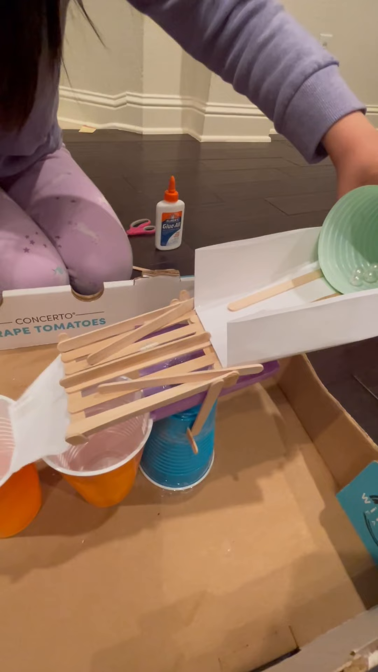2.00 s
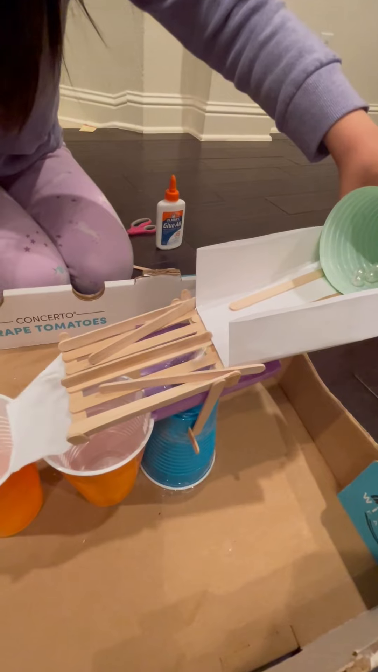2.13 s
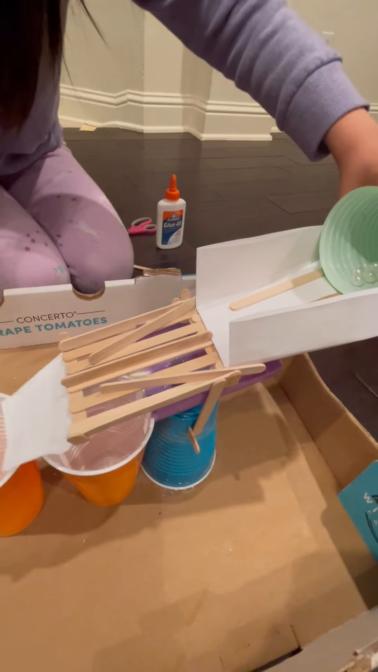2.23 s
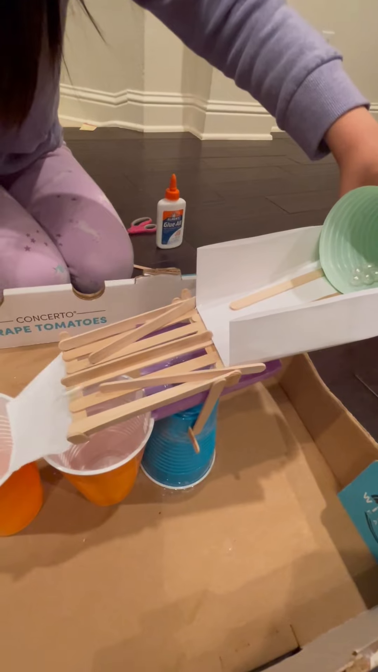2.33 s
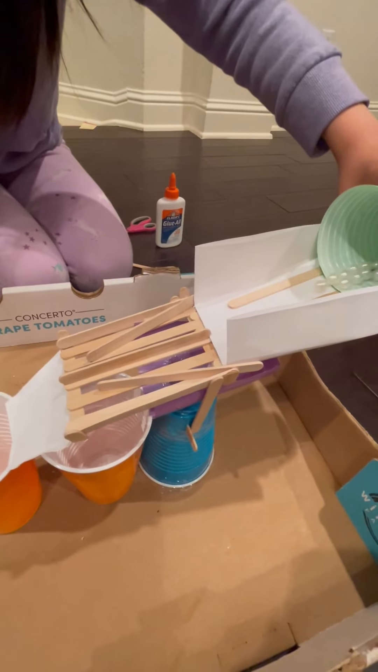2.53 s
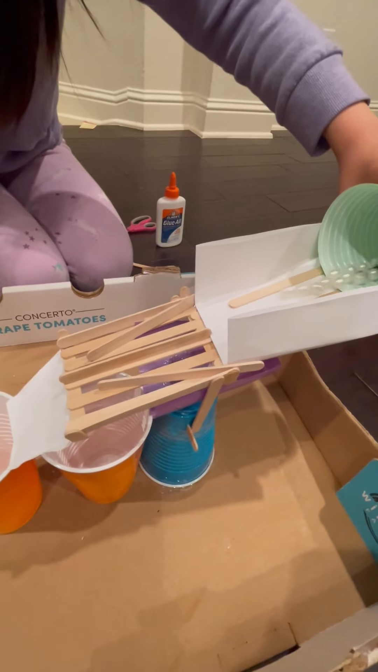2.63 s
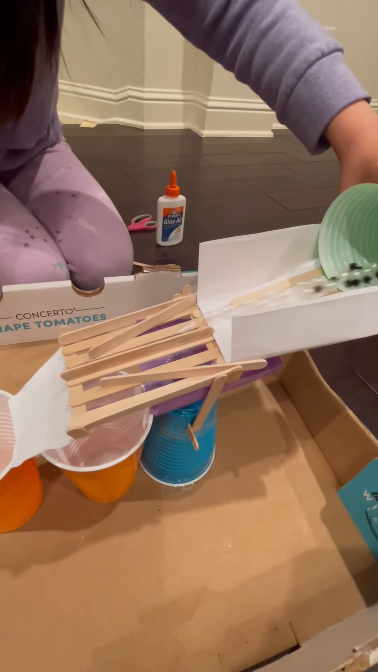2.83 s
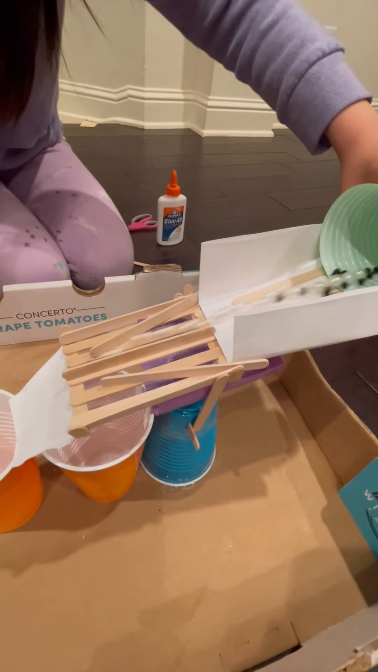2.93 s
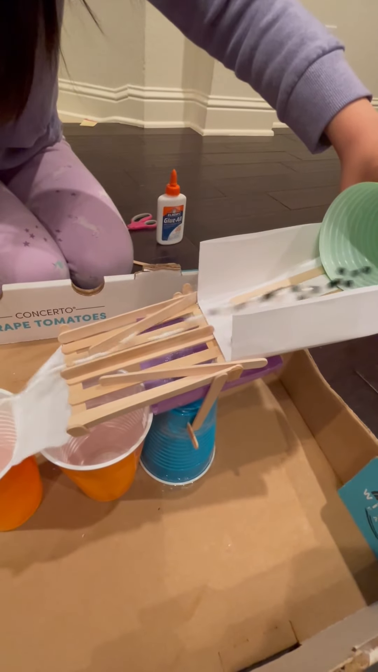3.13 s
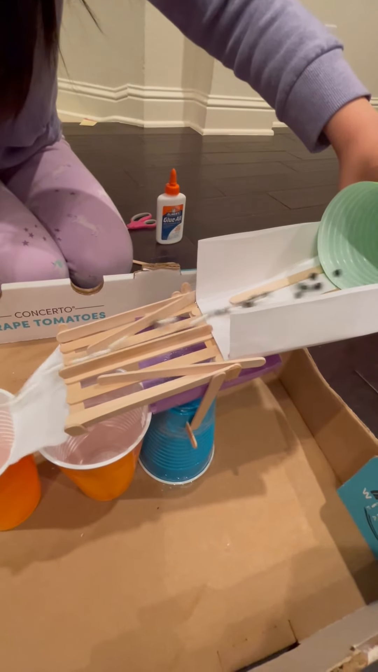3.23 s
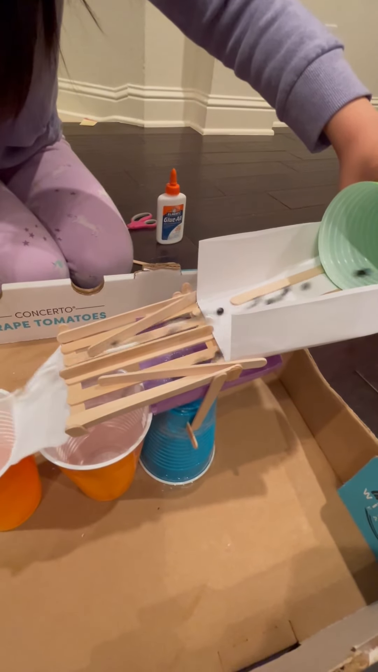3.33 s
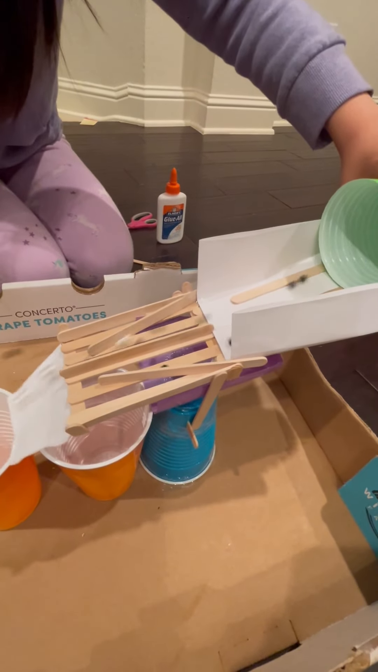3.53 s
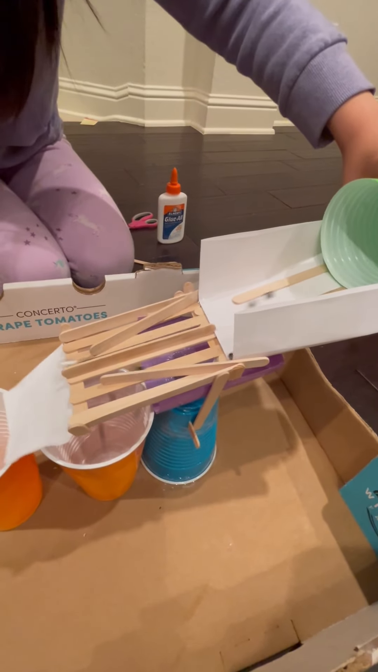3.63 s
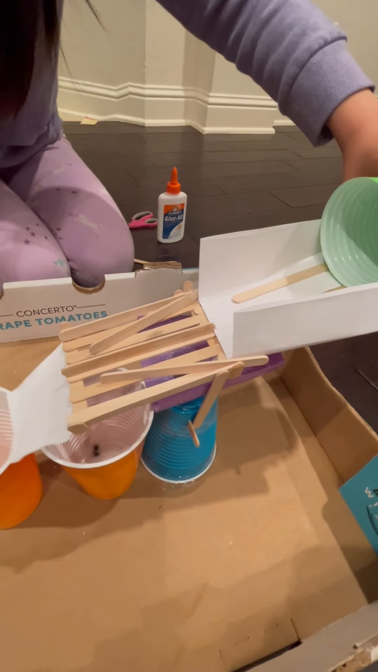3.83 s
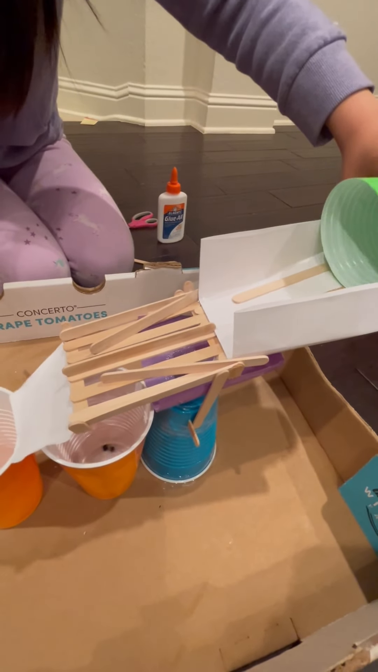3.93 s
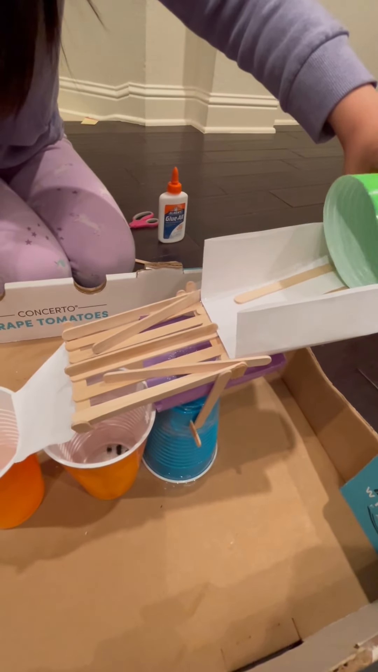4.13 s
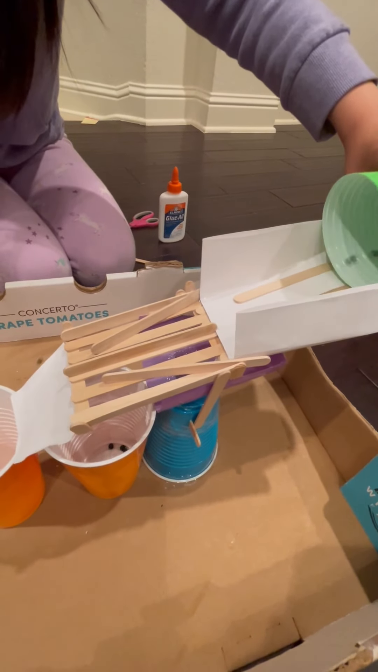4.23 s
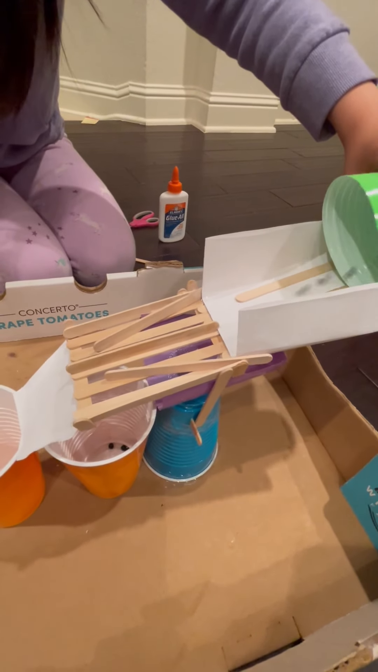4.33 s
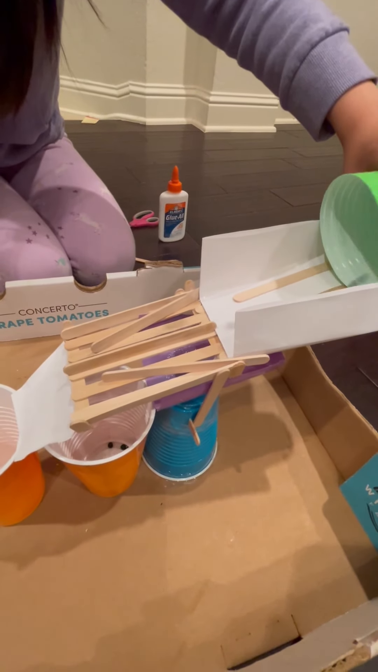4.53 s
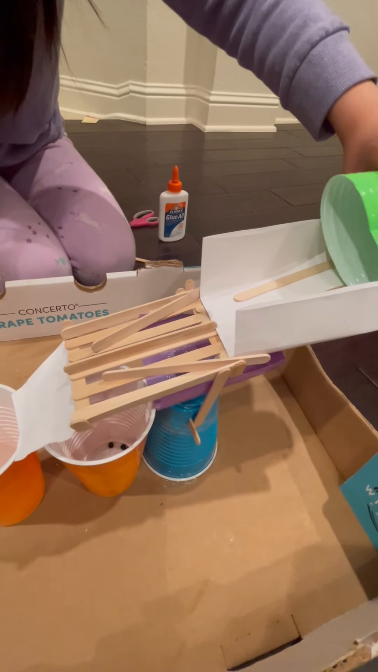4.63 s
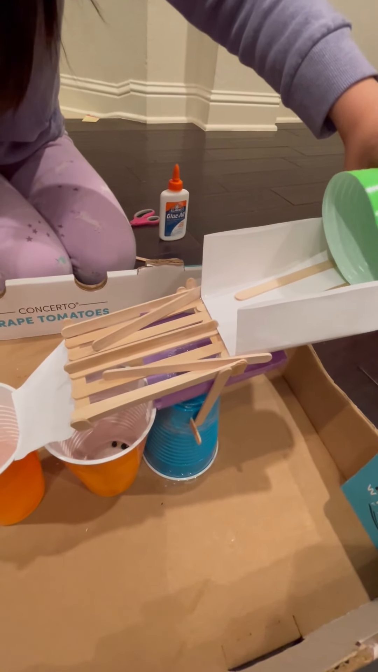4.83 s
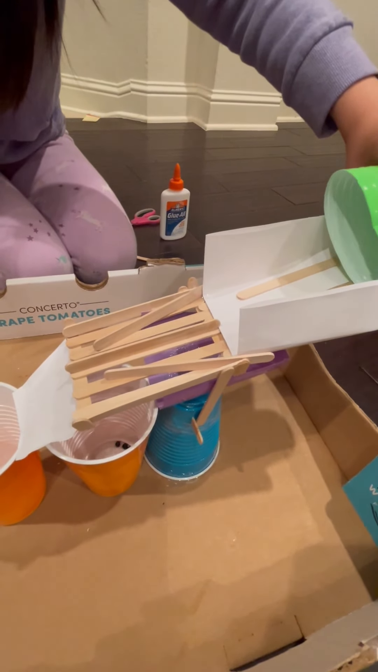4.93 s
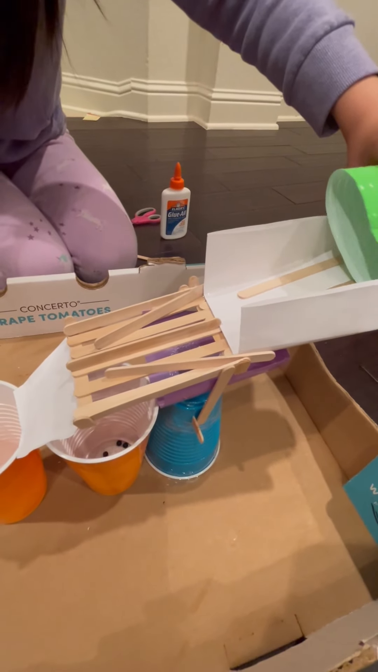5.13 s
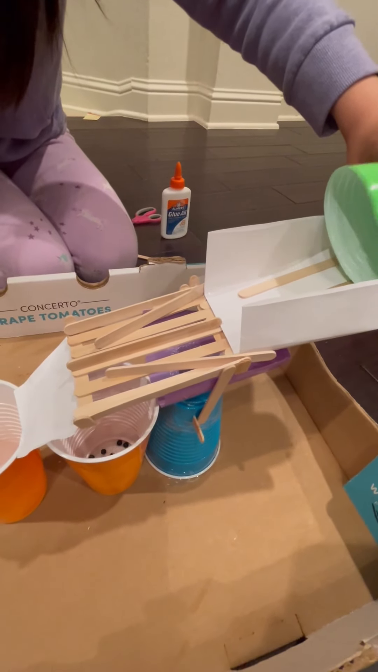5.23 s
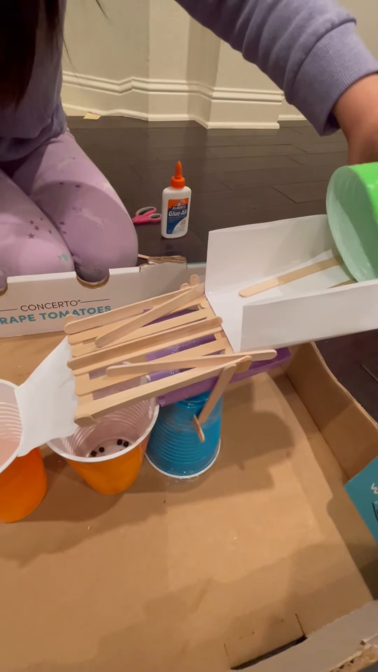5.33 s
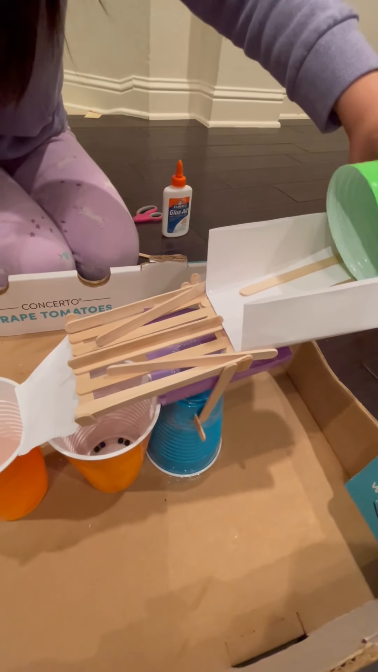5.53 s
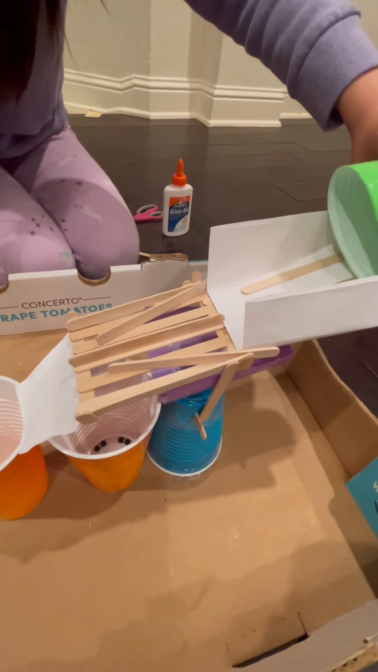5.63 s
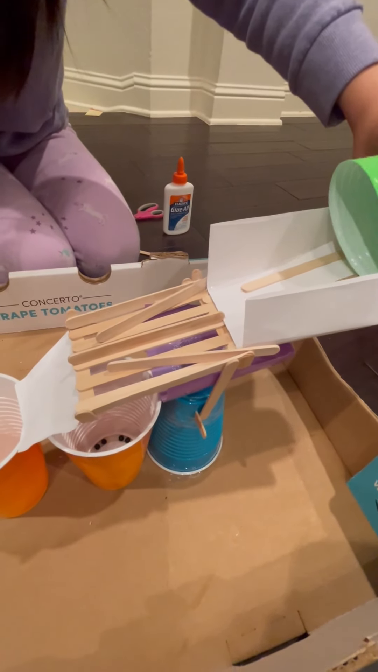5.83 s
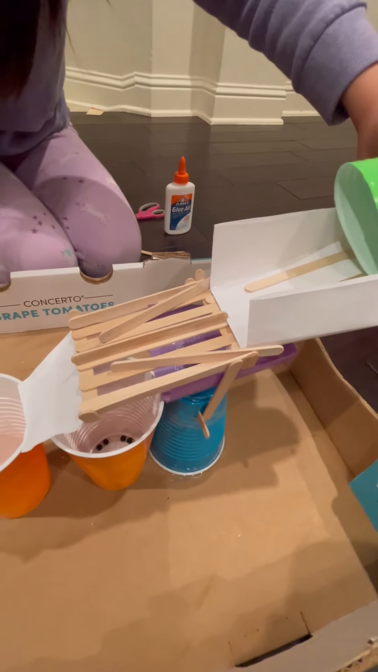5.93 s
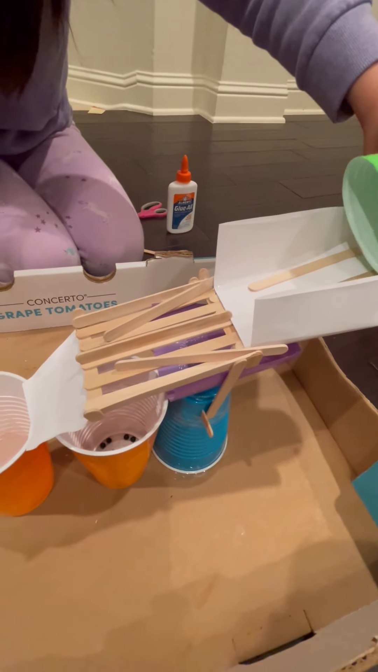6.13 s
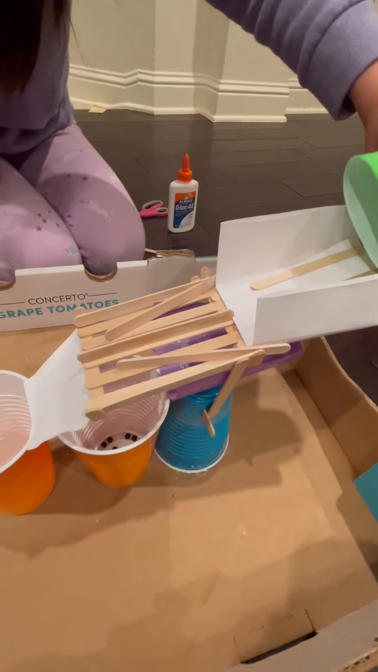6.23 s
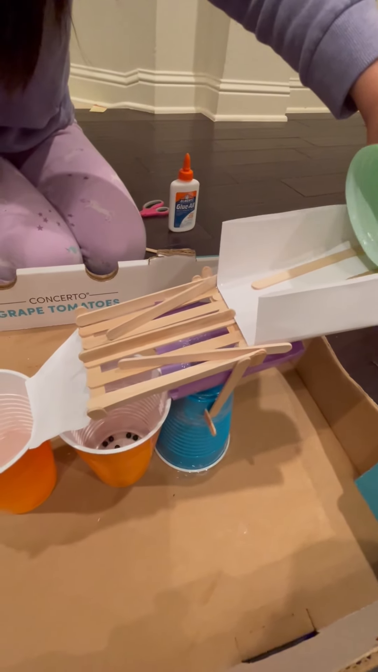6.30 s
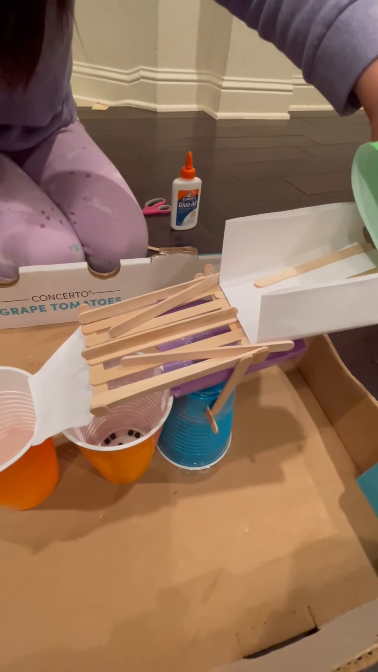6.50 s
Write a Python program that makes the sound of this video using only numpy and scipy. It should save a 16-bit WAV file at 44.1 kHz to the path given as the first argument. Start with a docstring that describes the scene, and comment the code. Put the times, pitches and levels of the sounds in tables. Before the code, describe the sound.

Close, dry clatter of tiny beads pouring down card and wooden sticks, cracking into plastic cups, circling hollowly and trailing off in stray ticks.

```python
"""A bowl of small plastic beads is tipped over a card chute and a ramp of wooden sticks, close by in a living room.
A few knocks and hollow rolling come first, then the heap slides in a hiss of tiny noise contacts.
A first wave taps, drums and skids down the card, and strikes and modal knocks ring from thin plastic.
Low bumps boom in the cardboard before a second, denser wave; then the last beads circle in a humming bowl
and stragglers rattle on. A short noise tail answers as the room, over a faint hush throughout."""
import sys
import numpy as np
from scipy import signal
from scipy.fft import rfft, irfft, next_fast_len
from scipy.io import wavfile
from scipy.ndimage import uniform_filter1d, minimum_filter1d

SR = 44100
rng = np.random.default_rng(int(sys.argv[2]) if len(sys.argv) > 2 else 0)


def unload_audio(sound):
    """Save the sound as a 16-bit wav file, at the path given as the first command line argument."""
    columns = np.transpose(np.atleast_2d(sound))
    # keep every value between -1 and 1, then stretch to whole-number steps
    steps = np.round(np.clip(columns, -1, 1) * 32767)
    wavfile.write(sys.argv[1], SR, steps.astype(np.int16))


N = 289516
TIME = np.arange(N) / SR

# colour of a bead cracking against plastic: f/Hz, gain/dB
CRACK_COLOUR = [(100, -22.5), (300, -8), (520, -1.5), (740, 4), (1100, 6), (1750, 6), (2150, 2), (3400, 9),
                (4700, 5), (5700, 3.5), (7500, -5.5), (10500, -7.5), (14300, -12.5), (15500, -18.5)]
# how much the beads circle and jostle on plastic: t/s, level/dB before the trims of each layer
ROLL_LEVEL = [(1.2, -66.5), (1.75, -59.5), (1.97, -42.5), (2.6, -38), (2.95, -42), (3.2, -40),
              (3.45, -34.5), (3.88, -33), (4.05, -40), (4.3, -50), (4.6, -52.5), (4.95, -45), (5.25, -47),
              (5.38, -61), (5.6, -65.5), (6.0, -64), (6.05, -51), (6.28, -65.5), (6.45, -67), (6.56, -88)]
# colour of beads rolling on plastic: f/Hz, gain/dB
ROLLING_COLOUR = [(59, -33), (100, -19), (289, -9.5), (547, -8), (768, 5.5), (1080, -7.5), (1520, -6),
                  (1740, -1), (1880, -2.5), (2050, -6), (2420, -3), (2750, -3), (3300, -5.5), (3580, -1.5),
                  (3900, -5), (4570, -8), (6020, -6), (7290, -3), (10500, -3)]
# two waves of beads roll down the card chute: t/s, level/dB before the trims of each layer
CHUTE_LEVEL = [(1.05, -70), (1.2, -50.5), (1.38, -53.5), (1.7, -43.5), (2.25, -45.5), (2.5, -53),
               (2.95, -45.5), (3.25, -40), (3.65, -46.5), (4.25, -97.5)]


def strikes(ring_db=0, detune=0.025, vary_db=5.5, clack_db=-13, body_db=0, tick_db=0,
            body_lag_s=0.00044, tick_t60=0.021):
    """Each bead cracks against a thin wall; where it lands decides which modes ring."""
    # the loudest strikes: t/s, clack level/dB, hollow body level/dB, glassy tick level/dB, before the trims
    loud_strikes = [(0.375, -69, -71, -82), (0.588, -37.5, -55, -52.5), (0.606, -41.5, -60, -61),
                    (0.6869, -41, -54, -62), (0.7143, -44, -52.5, -59), (0.7221, -34, -52, -58),
                    (0.7532, -35, -51, -48), (0.7761, -38, -56, -48), (0.7915, -31.5, -63, -44),
                    (0.8165, -27, -48, -43), (0.8614, -26, -62, -35.5), (0.9227, -27, -42, -38),
                    (0.9713, -29, -48, -41), (1.041, -31, -48, -34), (1.0662, -24, -47, -38.5),
                    (1.0757, -36, -51, -38), (1.1059, -30, -47, -46), (1.3129, -35, -46, -43),
                    (1.7419, -19, -34, -33.5), (1.7789, -26, -39, -34.5), (1.8143, -7.5, -21.5, -21.5),
                    (1.8396, -9, -30.5, -25), (1.8574, -7, -23.5, -29), (1.8776, -24, -49, -22),
                    (1.9277, -20.5, -34, -33.5), (1.9424, -24.5, -36, -39), (1.967, -9.5, -30.5, -21.5),
                    (2.0412, -10.5, -34, -26.5), (2.0581, -14, -32, -34), (2.0668, -20, -38, -33),
                    (2.078, -27, -33.5, -37), (2.1233, -19.5, -36, -46), (2.1405, -5.5, -25, -27.5),
                    (2.1789, -20, -40, -32.5), (2.2346, -10, -29.5, -24), (2.2175, -23.5, -41, -42),
                    (2.2787, -16, -37.5, -27), (2.2981, -11.5, -41, -26), (2.307, -20.5, -41, -27.5),
                    (2.3549, -15.5, -36, -31.5), (2.4179, -22, -41, -33), (2.438, -8.5, -23.5, -22),
                    (2.536, -18, -27.5, -32), (2.5974, -23.5, -41, -35), (2.6302, -5.5, -20, -20.5),
                    (2.7958, -11, -37, -23.5), (3.245, -5.5, -22.5, -22.5), (3.272, -27, -39, -38),
                    (3.2902, -20, -42, -38), (3.304, -14, -36, -30), (3.3195, -8.5, -29.5, -38),
                    (3.3246, -9, -33, -16), (3.3444, -11, -32, -27), (3.3803, -3.5, -20, -17.5),
                    (3.3995, -16, -34, -31), (3.4052, -7.5, -25, -24), (3.4275, -23, -43, -43),
                    (3.4532, -7.5, -39, -25), (3.4735, -16, -30, -34), (3.4993, -10, -28, -27),
                    (3.529, -13, -37, -25.5), (3.548, -11.5, -35, -30), (3.5844, -14, -31.5, -28.5),
                    (3.637, -19, -38, -39), (3.6444, -11, -35, -31), (3.649, -10, -40, -26),
                    (3.6533, -14, -37, -28), (3.6638, -10.5, -30, -26), (3.6838, -26, -40, -32),
                    (3.7057, -15, -38, -35), (3.7334, -13, -43, -24), (3.7439, -13, -28, -34),
                    (3.7535, -9, -33, -23), (3.7692, -13, -25, -36.5), (3.792, -8, -25, -28),
                    (3.7969, -10.5, -33, -42), (3.823, -7, -26, -23.5), (3.8477, -11, -43, -35),
                    (3.8724, -16, -38, -32), (3.9068, -18, -35, -33), (3.9184, -13, -30.5, -29.5),
                    (3.9512, -10.5, -40, -28), (3.9654, -5, -23, -17.5), (4.0076, -17.5, -35, -37),
                    (4.0725, -14, -33, -26.5), (4.117, -9.5, -33.5, -26), (4.1431, -15, -36, -49),
                    (4.1657, -18, -43, -38), (4.1755, -20, -39.5, -34.5), (4.2112, -26, -42, -42),
                    (4.247, -17, -38.5, -36.5), (4.2818, -26, -49, -54), (4.3537, -18.5, -41.5, -48.5),
                    (4.4059, -32, -47, -65), (4.4825, -36, -47, -59), (4.5234, -39, -53, -42.5),
                    (4.576, -29.5, -47, -59), (4.5875, -28, -61, -41.5), (4.6646, -29.5, -67, -40),
                    (4.6906, -33, -63, -43), (4.724, -30, -53, -40), (4.7391, -32, -54, -37.5),
                    (4.7524, -16.5, -38.5, -44), (4.786, -24, -42, -41), (4.8005, -9, -31.5, -21.5),
                    (4.8214, -21.5, -44, -36), (4.846, -26, -42, -33), (4.877, -10.5, -26.5, -22.5),
                    (4.8884, -18, -55, -33), (4.9049, -10.5, -39, -25.5), (4.9224, -19, -47, -40),
                    (4.9587, -12.5, -29, -24.5), (4.9831, -8, -38.5, -17), (4.9904, -19, -51, -38),
                    (5.0252, -6.5, -37, -20), (5.043, -17.5, -43, -29), (5.1318, -20.5, -32.5, -30.5),
                    (5.139, -22, -40, -37), (5.174, -24, -38.5, -28.5), (5.1651, -8, -35, -24),
                    (5.2684, -24, -41.5, -35.5), (5.3482, -49, -59, -67), (5.3974, -38.5, -44, -59),
                    (5.4473, -41, -54, -71), (5.4892, -33, -56, -47), (5.5103, -36, -49.5, -59),
                    (5.521, -36, -57, -57), (5.54, -42, -54, -64), (5.5719, -41, -55.5, -63),
                    (5.6307, -24.5, -48.5, -38), (5.6886, -37, -57, -55), (5.7165, -37.5, -49, -53),
                    (5.7555, -31.5, -56, -33), (5.8363, -24.5, -46.5, -47), (5.891, -33.5, -51.5, -46),
                    (6.0322, -12, -31, -26.5), (6.0785, -25, -50, -39), (6.0993, -22.5, -42, -41),
                    (6.1045, -22, -42, -36.5), (6.1405, -25.5, -38, -40), (6.2276, -48.5, -48.5, -65),
                    (6.4116, -51, -66, -63), (6.4685, -36.5, -51, -54)]
    # what the thin plastic rings with: f/Hz, level/dB before its variation, t60/s
    plastic_modes = [(647, -10, 0.054), (756, -6, 0.032), (860, -20.5, 0.075), (1632, -5, 0.016),
                     (1897, -7.5, 0.047), (2804, -11.5, 0.026), (3774, -24.5, 0.051), (4800, -58, 0.017),
                     (5373, -13.5, 0.026), (10360, -5.5, 0.019)]
    size, onset = 3600, 600  # samples: a whole strike, and the start that sets its level
    # lighter strikes among the moving beads: clack, body and tick in dB relative to the jostling
    light_strikes = by_chance(jostle_db, per_s=30, scatter_db=1.5, offsets_db=(10.5, -13.5, -3.5))
    rows = list(loud_strikes) + light_strikes
    t = np.arange(size) / SR
    hz, mode_db, t60 = np.transpose(plastic_modes)
    rings = undb(mode_db + ring_db)[:, None] * fade(t, t60[:, None])
    blows = []
    for _ in rows:
        pitch, weight = rng.standard_normal((2, len(hz), 1))
        phase = 2 * np.pi * rng.random((2, len(hz), 1))
        mode_hz = hz[:, None] * (1 + detune * pitch)
        modes = rings * undb(vary_db * weight) * np.sin(2 * np.pi * mode_hz * t + phase)
        blows.append(crack(t) + .5 * modes.sum(axis=1))
    blows = colour(np.concatenate(blows), CRACK_COLOUR)
    clack = band(blows, 1050, 7000)
    body = band(blows, 240, 1050)
    tick = band(blows, 7000, 17000) * fade(t, tick_t60)
    # the wall's slow bending swells just after the contact; the hard tick dies first
    parts = [(clack, clack_db, 0), (body, body_db, body_lag_s), (tick, tick_db, 0)]
    out = np.zeros((2, N + 2 * size))
    for column, (part, trim_db, lag) in enumerate(parts):
        for row, blow in zip(rows, part.reshape(-1, 2, size)):
            start = int((row[0] + lag) * SR)
            even = blow / blow[:, :onset].std(axis=1, keepdims=True)
            out[:, start:start + size] += even * undb(row[1 + column] + trim_db)
    return out[:, :N]


def crack(t, round_s=0.00087, echo_t60=0.026, smear_t60=0.00076, hold_s=0.0026,
          wash_db=-12, wash_t60=0.04, contact_s=0.00056):
    """A click, smeared by the bending wall, bounces across the cup and blurs into a short wash."""
    count = 10
    gaps = round_s * rng.uniform(.7, 1.3, count)
    when = np.cumsum(gaps) - gaps[0]
    arrivals = np.zeros(len(t))
    arrivals[(when * SR).astype(int)] = fade(when, echo_t60) * rng.uniform(.4, 1.4, count)
    clicks = signal.lfilter([1], [1, -fade(1 / SR, smear_t60)], arrivals)
    wash = fade(np.maximum(t - hold_s, 0), wash_t60)
    press = 1 - np.exp(-t / contact_s)
    return .5 * press * (clicks / undb(wash_db) + wash) * rng.standard_normal((2, len(t)))


def taps(t60=0.026, level_db=1, edge_db=-4.5):
    """Card and wood hardly ring: a short, dull clack, with a bright edge where the contact is hard."""
    # the loudest dry taps on the card chute and the sticks: t/s, clack level/dB, edge level/dB, before the trims
    loud_taps = [(1.268, -27, -59), (1.288, -32, -62), (1.3376, -27, -51), (1.3807, -44, -57),
                 (1.43, -35, -55), (1.455, -27, -39.5), (1.4761, -22, -50), (1.4869, -22, -48),
                 (1.5047, -23.5, -34), (1.527, -31, -52), (1.559, -27, -44), (1.5758, -28, -41),
                 (1.5853, -23.5, -39), (1.591, -22, -34), (1.6198, -27, -35), (1.6246, -24, -31),
                 (1.6656, -36.5, -43), (1.6958, -32, -45), (1.7023, -29, -47), (1.7129, -26, -39),
                 (1.724, -33, -48), (1.75, -25, -43), (1.8027, -23, -55), (2.952, -29, -50),
                 (3.0764, -30, -31), (3.119, -27, -29.5), (3.153, -24, -32.5), (3.1724, -20.5, -49),
                 (3.208, -21.5, -41), (4.4823, -22, -47), (5.836, -28, -36), (6.493, -38.5, -71)]
    # colour of a tap: f/Hz, gain/dB
    tap_tint = [(150, -2.5), (260, 0), (420, 3.5), (1100, 7.5), (1700, 13), (2800, 12.5), (3700, 2.5),
                (4600, 8), (5200, 10.5), (5800, 5.5), (9000, 0.5), (15000, -13.5)]
    # lighter taps while beads are on the chute: clack and edge in dB relative to the chute curve
    light_taps = by_chance(chute_db, per_s=40, scatter_db=1.5, offsets_db=(13, -0.5))
    out = np.zeros((2, N + SR))
    t = np.arange(SR // 20) / SR
    onset = 600  # samples that set the edge's level
    for s, db, bright_db in loud_taps + light_taps:
        tap = colour(rng.standard_normal((2, len(t))) * fade(t, t60), tap_tint)
        dull, edge = band(tap, 180, 3600), band(tap, 3900, 16000)
        dull = dull / np.abs(dull[0]).max() * undb(db + level_db)
        edge = edge / rms(edge[:, :onset]) * undb(bright_db + edge_db)
        start = int(s * SR)
        out[:, start:start + len(t)] += dull + edge
    return out[:, :N]


def knocks(push_s=0.00092, level_db=0):
    """Bowl, cup or card rings in a few close modes; the higher the pitch, the sooner they die."""
    # contacts that leave a resonance ringing: t/s, level/dB, f/Hz, ring length relative to the usual
    contacts = [(0.374, -61, 703, 0.56), (.589, -43, 780, 1.2), (.607, -42, 793, 1), (.621, -37, 760, 0.97),
                (1.185, -25.5, 840, 0.87), (1.269, -20.5, 2050, .5), (1.291, -26, 2140, .5),
                (1.3375, -20, 2190, 0.43), (1.478, -18, 2300, 0.48), (1.587, -18.5, 1780, 0.5),
                (1.814, -3, 3740, 1.3), (1.841, -18, 1880, 1), (1.878, -11, 3540, 1.2),
                (1.933, -24, 784, 0.81), (1.968, -10, 840, 0.56), (2.072, -25, 728, 1.7),
                (2.167, -28, 794, 1.3), (2.268, -25, 750, 0.85), (2.356, -23.5, 810, 0.68),
                (2.440, -12, 716, 0.67), (2.525, -13.5, 3360, 0.96), (2.577, -30.5, 780, 1.2),
                (2.597, -17, 3550, 1.4), (2.631, -7, 2707, 1.36), (2.633, -21, 740, 1.2),
                (2.795, -14, 1870, 1.4), (2.800, -32.5, 807, 2.1), (3.320, -11, 3480, 1.3),
                (3.382, -18, 699, 1.1), (3.453, -11, 3540, 1.4), (3.514, -20.5, 751, 1.6),
                (3.523, -10, 3530, 1.6), (3.578, -24.5, 807, 1.3), (3.655, -21, 1630, 1.1),
                (3.657, -29, 807, 1.2), (3.793, -22, 1950, 1.5), (3.913, -29, 760, 0.96),
                (3.952, -11, 1896, 1.3), (4.791, -26, 795, 0.73), (4.985, -8.5, 1954, 1.4),
                (5.043, -9.5, 4980, 1.4), (5.226, -36, 934, 1.2), (5.306, -39, 785, 0.78),
                (5.398, -42, 845, .35), (5.401, -41, 285, 0.28), (5.648, -33.5, 835, 0.82),
                (5.742, -33.5, 804, 0.53), (5.836, -23.5, 1278, 1.36), (5.837, -34.5, 710, 1.1),
                (5.866, -35.5, 694, 0.92), (5.892, -8, 5250, 0.66), (6.034, -10, 1640, 0.33),
                (6.035, -24, 686, 1.7), (6.142, -42, 700, 3.3), (6.308, -41, 1870, 0.68),
                (6.492, -25, 850, 0.66), (6.493, -26.5, 1080, 0.38)]
    # what a knock rings with: multiple of the pitch, level/dB, usual cycles to fade by 60 dB
    mode_rows = [(.8, -28.5, 41), (.92, -12, 70), (1.002, 2.5, 33), (1.14, -9.5, 43), (1.35, -16, 30.5),
                 (1.899, -13, 34.5), (2.699, -6.5, 41)]
    out = np.zeros(N + SR)
    t = np.arange(SR // 4) / SR
    for s, db, hz, length in contacts:
        ring = np.zeros(len(t))
        for multiple, mode_db, cycles in mode_rows:
            mode_hz = hz * multiple
            tone = np.sin(2 * np.pi * (mode_hz * t + rng.random()))
            ring += undb(mode_db) * fade(t, length * cycles / mode_hz) * tone
        start = int(s * SR)
        out[start:start + len(t)] += undb(db + level_db) * ring * (1 - np.exp(-t / push_s))
    return np.array([band(out[:N], 180, 17000), np.zeros(N)])


def sliding(creep_start_s=0.54, creep_db=-53.5, creep_rise_s=0.11, creep_t60=0.76):
    """A few beads start to roll hollowly, then the heap slips over the bowl's wall in a hiss of contacts."""
    # colour of the slide: f/Hz, gain/dB
    slide_tint = [(59, -53), (100, -25), (328, -27), (471, -4.5), (595, -20.5), (891, 5.5), (1450, -14.5),
                  (2000, -5), (2690, -9.5), (4800, -7), (5900, -5), (7290, -8), (10500, -12),
                  (12400, -15.5), (14100, -23.5), (16000, -20)]
    contacts = patter(rate=1100, scatter_db=3, t60=.012)
    hiss = colour(contacts, slide_tint)
    hollow = band(colour(contacts, ROLLING_COLOUR), 570, 1240)
    since = np.maximum(TIME - creep_start_s, 0)
    creep = undb(creep_db) * (1 - np.exp(-since / creep_rise_s)) * fade(since, creep_t60)
    hiss_gain = undb(slide_db(TIME)) + undb(2.5) * creep
    return hiss / rms(hiss) * hiss_gain + hollow / rms(hollow) * creep


def slide_db(times):
    """Level of the sliding heap: a quick rise as it breaks loose, a slow sag, then it stops."""
    full_s, stop_s, full_db = 0.815, 1.2, -33.5
    rise, sag, stop = 279, 19.5, 323  # dB per s
    since = times - full_s
    db = full_db + np.minimum(rise * since, -sag * since)
    return np.maximum(db - stop * np.maximum(times - stop_s, 0), -140)


def jostle_db(times, grain_db=-9.5):
    """How hard beads jostle on plastic: rolling free, or as single contacts standing out of the slide."""
    return np.maximum(level_at(ROLL_LEVEL, times), slide_db(times) + grain_db)


def chute(level_db=-4.0, drum_db=-1, drum_width_hz=100):
    """Many beads roll together on the card, which drums at a shifting pitch under a fine chatter."""
    # colour of the chatter: f/Hz, gain/dB
    chatter_tint = [(59, -40.5), (100, -13), (181, -3.5), (290, 2), (390, 0.5), (470, 1.5), (570, -6.5),
                    (891, 7.5), (1200, -6.5), (1800, 1.5), (2170, -6), (3120, -9.5), (3860, -22),
                    (5080, -30.5), (7140, -16), (16000, -38)]
    # the card drums lower as each wave rolls out onto its unsupported middle: t/s, f/Hz
    drum_pitch = [(1.15, 460), (1.45, 390), (1.7, 335), (2.0, 370), (2.3, 360), (2.85, 410), (3.1, 370),
                  (3.35, 330), (3.8, 380)]
    chatter = colour(patter(rate=700, scatter_db=4.5, t60=.009), chatter_tint)
    chatter = band(chatter, 90, 17000) / rms(band(chatter, 200, 520))
    drum_hz = np.interp(TIME, *np.transpose(drum_pitch))
    drum = resonate(patter(rate=900, scatter_db=3.5, t60=.012), drum_hz, drum_width_hz)
    return (chatter * undb(level_db) + drum / rms(drum) * undb(drum_db)) * follow(CHUTE_LEVEL)


def chute_db(times):
    """How busy the card chute is."""
    return level_at(CHUTE_LEVEL, times)


def skidding(level_db=-3):
    """Beads of the first wave scrape over the card in quick, gritty catches."""
    # the scraping: t/s, level/dB before the trim
    skid_curve = [(1.41, -70), (1.47, -41), (1.54, -43), (1.61, -35), (1.71, -42), (1.78, -64),
                  (1.9, -60.5)]
    # colour of the scraping: f/Hz, gain/dB
    skid_tint = [(300, -24), (1200, -7), (1650, 4.5), (2000, -7), (2400, 9), (3100, -1.5), (3900, -6),
                 (4700, -23), (5150, -2), (5600, -17), (7000, -26), (16000, -25)]
    grit = colour(patter(rate=500, scatter_db=5.5, t60=0.0123), skid_tint)
    return grit / rms(grit) * follow(skid_curve) * undb(level_db)


def rolling(rattle_db=5.0, fizz_db=0, clink_db=-3, busy_db=-35.5, fizz_growth=1.72):
    """Beads circling on plastic chatter on the wall; the busier they are, the more they brush and clink."""
    contacts = patter(rate=330, scatter_db=4.2, t60=.014)
    rattle = band(colour(contacts, ROLLING_COLOUR), 130, 7540)
    fizz = band(colour(patter(rate=1200, scatter_db=10.0, t60=0.082), CRACK_COLOUR), 7800, SR / 2)
    clinks = band(colour(patter(rate=90, scatter_db=3.5, t60=.005), CRACK_COLOUR), 4500, 17000)
    bright = fizz / rms(fizz) * undb(fizz_db) + clinks / rms(clinks) * undb(clink_db)
    # the bright part grows by fizz_growth dB per dB of rolling and equals its level at busy_db
    crowding = undb(busy_db + fizz_growth * (level_at(ROLL_LEVEL, TIME) - busy_db))
    return rattle / rms(rattle) * follow(ROLL_LEVEL) * undb(rattle_db) + bright * crowding


def hollow_rings(hops_per_s=45, hop_db=1.5, scatter_db=4, detune=.02):
    """Small hops of the rolling beads set the plastic ringing, each at a slightly different pitch."""
    # resonances kept ringing: f/Hz, level/dB relative to the rolling curve before hop_db, t60/s
    hollow_modes = [(740, -4.5, 0.072), (1892, -7, 0.093), (3630, -5.5, .06)]
    out = np.zeros(N + SR)
    t = np.arange(SR // 10) / SR
    for hz, mode_db, t60 in hollow_modes:
        hops = by_chance(lambda s: level_at(ROLL_LEVEL, s), hops_per_s, scatter_db, (mode_db + hop_db,))
        for s, db in hops:
            ring = np.sin(2 * np.pi * hz * (1 + detune * rng.standard_normal()) * t)
            start = int(s * SR)
            out[start:start + len(t)] += undb(db) * fade(t, t60) * ring
    return np.array([out[:N], np.zeros(N)])


def circling(scatter_db=4.5, bowl_hz=976, width_hz=370, wander=0.058, wander_per_s=9):
    """The last beads keep the bowl's hollow resonance going; its pitch wanders as they move over the wall."""
    # the hum: t/s, level/dB
    hum_curve = [(4.15, -45), (4.33, -46), (4.52, -45), (4.66, -66), (4.8, -45), (5.0, -52.5),
                 (5.25, -48.5), (5.42, -67), (5.6, -74)]
    contacts = patter(rate=600, scatter_db=scatter_db, t60=.01)
    hum = resonate(contacts, bowl_hz * (1 + wander * drift(wander_per_s)), width_hz)
    return hum / rms(hum) * follow(hum_curve)


def rumble(chute_trim_db=-20, roll_trim_db=-29, attack_s=0.015, t60=0.43, second_mode=1.88, shudder_db=-13):
    """Cardboard shudders faintly under the rolling beads, and booms in two low modes when the bowl bumps it."""
    # the bumps: t/s, level/dB before the swell and decay, lowest f/Hz, second mode level/dB relative to the first
    bump_rows = [(2.355, -53, 60, -10), (2.42, -46, 50, -20), (2.535, -48, 52, -18),
                 (2.59, -39.5, 126, -22.5), (2.635, -29.5, 68, -4), (2.765, -41, 61.6, -5),
                 (2.80, -43, 44.6, -5.5), (2.90, -48, 48, -10)]
    # colour of the shudder: f/Hz, gain/dB
    shudder_tint = [(25, 10.5), (40, -15.5), (70, -2.5), (98, -3.5), (129, -3.5), (200, 2)]
    shudder = band(colour(rng.standard_normal((2, N)), shudder_tint), 35, 157)
    gain = follow(CHUTE_LEVEL) * undb(chute_trim_db) + follow(ROLL_LEVEL) * undb(roll_trim_db)
    boom = np.zeros((2, N))
    for s, db, hz, second_db in bump_rows:
        since = np.maximum(TIME - s, 0)
        swell = undb(db) * (1 - np.exp(-(since / attack_s) ** 2)) * fade(since, t60)
        turn = 2 * np.pi * hz * since
        boom[0] += swell * (np.sin(turn) + undb(second_db) * np.sin(second_mode * turn))
        gain = gain + swell * undb(shudder_db)  # each bump also shakes the card loosely
    return boom + shudder / rms(shudder) * gain


def room(x, wet_db=-12.0, mid_t60=0.29, treble_t60=0.16, treble_db=-2, build_s=0.00016):
    """Floor and walls answer with a short tail that loses its treble first."""
    t = np.arange(int(.7 * SR)) / SR
    noise = rng.standard_normal((2, len(t)))
    low = band(noise, 150, 6500) * fade(t, mid_t60)
    high = band(noise, 6500, 17000) * fade(t, treble_t60)
    tail = (low + undb(treble_db) * high) * (1 - np.exp(-(t / build_s) ** 2))
    tail /= np.sqrt(np.sum(tail[0] ** 2))
    return undb(wet_db) * signal.fftconvolve(x[:1], tail, axes=1)[:, :N]


def air(level_db=-78):
    """The faint hush of the room: steady coloured noise."""
    # colour of the hush: f/Hz, gain/dB
    air_tint = [(15, 18), (25, -18), (53, 18.5), (108, 14), (439, -3.5), (516, 3), (575, -12.5), (760, -8),
                (850, 5.5), (950, -7.5), (2110, -11.5), (16000, -17)]
    hush = band(colour(rng.standard_normal((2, N)), air_tint), 42.5, 17000)
    return hush / rms(hush) * undb(level_db)


def ports(pair):
    """A direct sound and an unrelated scattered one, as two microphone ports pick them up."""
    # unrelated share: f/Hz, level/dB
    spread_curve = [(100, -26), (700, -17), (1800, -17), (2300, -7), (3800, -5), (5500, -8), (9000, -9),
                    (11000, -15), (13000, -8)]
    # phase by which left leads right: f/Hz, phase/rad
    lead_curve = [(100, 0), (700, -.3), (2300, -.3), (3700, .5), (4250, 1.5), (5000, .6), (6500, 2),
                  (8400, 4.1), (11000, 6.2), (15500, 11)]
    # left minus right: f/Hz, level/dB
    lean_curve = [(300, 0), (700, 3), (1300, .4), (1900, 3.8), (2750, -5), (3900, -3), (6000, -.5),
                  (8000, -1.2), (11000, -.2)]
    size = next_fast_len(N)
    hz = np.fft.rfftfreq(size, 1 / SR)
    direct, scattered = rfft(pair, size)
    scattered = scattered * undb(at(spread_curve, hz))
    # half of each difference goes to either side
    turn = undb(at(lean_curve, hz) / 2) * np.exp(.5j * at(lead_curve, hz))
    left = (direct + scattered) * turn
    right = (direct - scattered) / turn
    return irfft(np.array([left, right]), size)[:, :N]


def patter(rate, scatter_db, t60):
    """Countless tiny contacts of uneven strength, each a very short burst of noise."""
    chance, strength = rng.random(N), np.minimum(rng.exponential(size=N), 4)
    energy = (chance < rate / SR) * undb(scatter_db * strength) ** 2
    energy = signal.lfilter([1], [1, -fade(1 / SR, t60) ** 2], energy)
    return np.sqrt(energy / energy.mean()) * rng.standard_normal((2, N))


def by_chance(level_db, per_s, scatter_db, offsets_db):
    """Rows (s, dB, ..) of random contacts as strong as level_db(times); none while the beads are nearly still."""
    count, still_db = 400, -62
    wait = rng.gamma(2, .5, count)
    luck = rng.standard_normal((count, len(offsets_db) + 1))
    times = np.cumsum(wait) / per_s
    level = level_db(times)
    # one scatter shared by the whole contact, another for each of its parts
    levels = level[:, None] + np.array(offsets_db) + scatter_db * (luck[:, :1] + luck[:, 1:])
    return [(s, *db) for s, db, now in zip(times, levels, level) if now > still_db and s < N / SR]


def resonate(x, hz, width_hz):
    """A resonance whose centre follows hz: shift it down to zero, low-pass, shift it back."""
    turn = np.exp(2j * np.pi * np.cumsum(hz) / SR)
    lowpass = signal.butter(2, width_hz / 2, fs=SR, output="sos")
    return (signal.sosfilt(lowpass, x / turn) * turn).real


def drift(per_s):
    """A smooth random wander through per_s random points a second, drawn with unit spread."""
    steps = rng.standard_normal(1000)
    return np.interp(TIME * per_s, np.arange(len(steps)), steps)


def colour(x, points):
    """Causal minimum-phase filter with the given (Hz, dB) response."""
    size = 2048
    cepstrum = irfft(np.log(undb(at(points, np.fft.rfftfreq(size, 1 / SR)))))
    # folding the cepstrum forward puts all the response after the contact
    cepstrum[1:size // 2] *= 2
    cepstrum[size // 2 + 1:] = 0
    response = irfft(np.exp(rfft(cepstrum)))
    return signal.oaconvolve(x, response[None], axes=1)[:, :x.shape[-1]]


def band(x, lo_hz, hi_hz):
    """Steep band-pass."""
    return signal.sosfilt(signal.butter(4, [lo_hz, min(hi_hz, SR / 2 - 1)], "band", fs=SR, output="sos"), x)


def at(points, hz):
    """Read (Hz, value) points on a log-frequency axis."""
    f, value = np.transpose(points)
    return np.interp(np.log(hz + 1), np.log(f), value)


def level_at(table, times):
    """Read a dB curve at the given times; practically silent outside it."""
    s, db = np.transpose(table)
    return np.interp(times, s, db, left=-140, right=-140)


def follow(table):
    """Gain along a dB curve."""
    return undb(level_at(table, TIME))


def fade(t, t60):
    """Exponential decay by 60 dB in t60 seconds."""
    return np.exp(-np.log(1000) * t / t60)


def undb(db):
    """Decibels to gain."""
    return 10 ** (np.asarray(db) / 20)


def rms(x):
    """Root mean square."""
    return np.sqrt(np.mean(x ** 2)) + 1e-12


def scene(diffuse_db=-7):
    """All the beads, the cardboard and the room around them."""
    on_plastic = strikes() + knocks() + sliding() + rolling() + hollow_rings() + circling()
    on_card = taps() + chute() + skidding()
    near = on_plastic + on_card
    echo = room(near)
    # the room's answer comes from all sides: part of it is opposite left and right
    wide = undb(diffuse_db) * echo[1] * np.array([[1], [-1]])
    return ports(near + echo + rumble() + air()) + wide


def record(dry):
    """The phone's limiter ducks for a moment around the sharpest peaks; the top is cut."""
    size, ceiling, top_hz = int(.0015 * SR), .76, 16000
    needed = np.minimum(1, ceiling / (np.abs(dry).max(axis=0) + 1e-9))
    gain = uniform_filter1d(minimum_filter1d(needed, size), size)
    return signal.sosfilt(signal.ellip(8, .2, 70, top_hz, fs=SR, output="sos"), dry * gain)


dry = scene()
out = record(dry)
unload_audio(out)
```